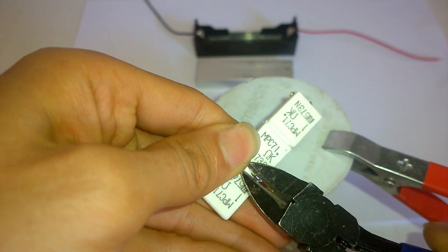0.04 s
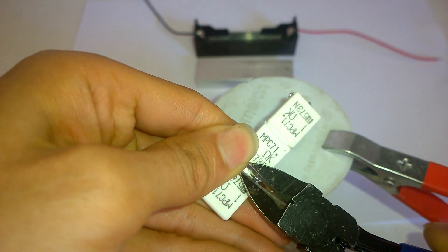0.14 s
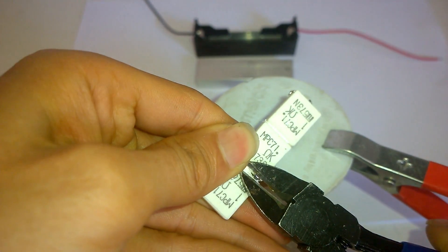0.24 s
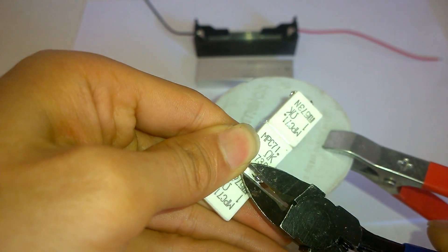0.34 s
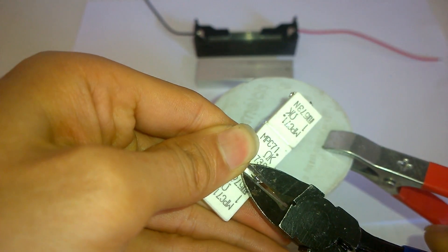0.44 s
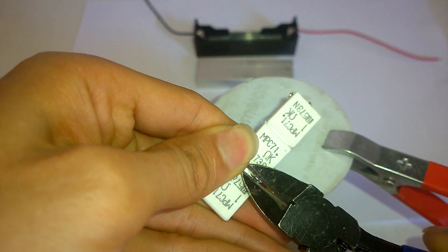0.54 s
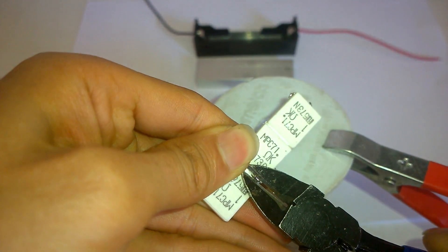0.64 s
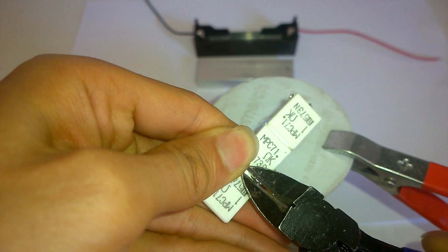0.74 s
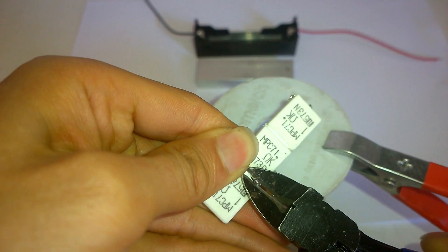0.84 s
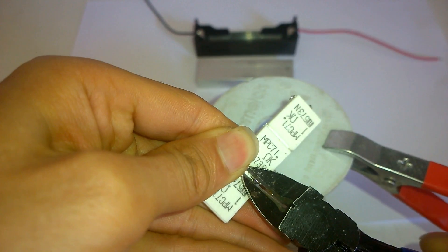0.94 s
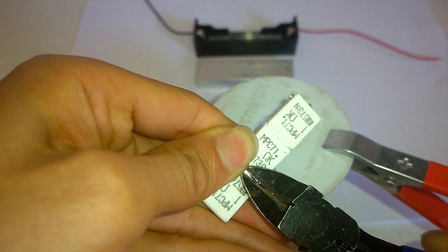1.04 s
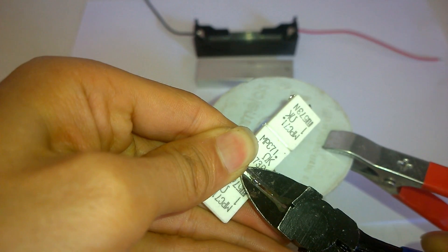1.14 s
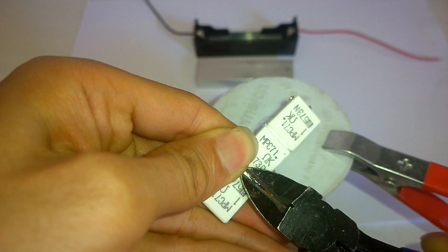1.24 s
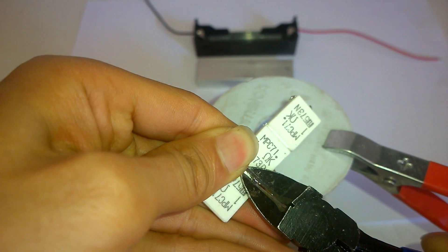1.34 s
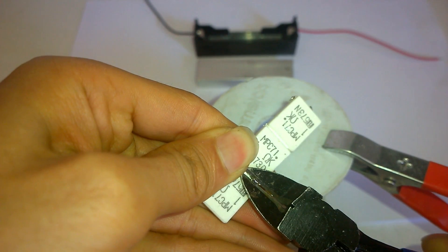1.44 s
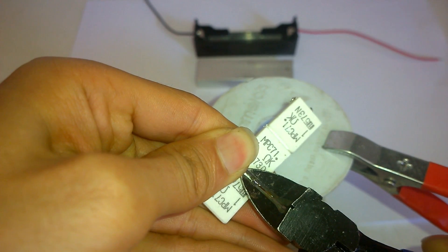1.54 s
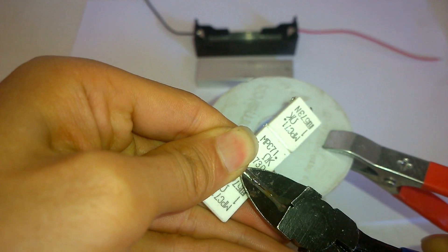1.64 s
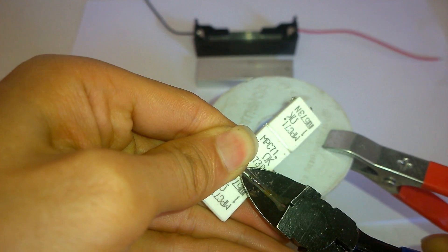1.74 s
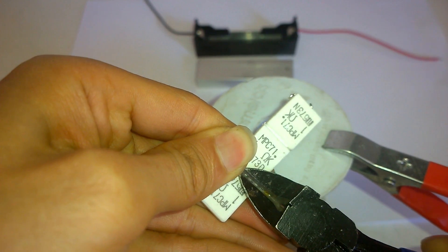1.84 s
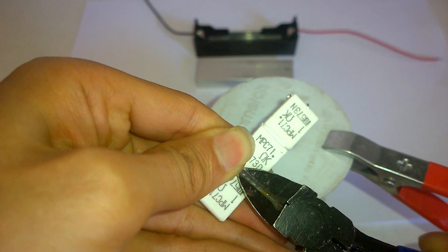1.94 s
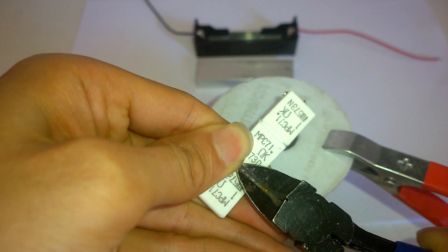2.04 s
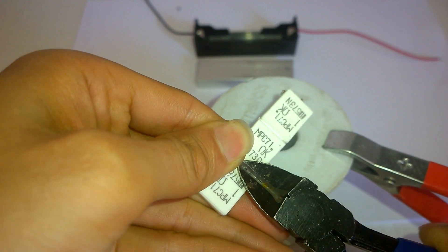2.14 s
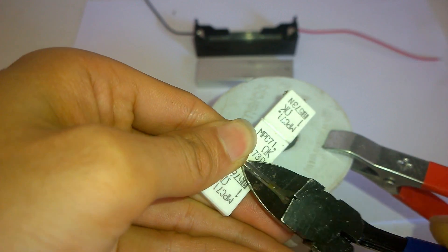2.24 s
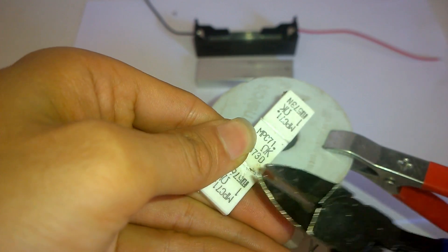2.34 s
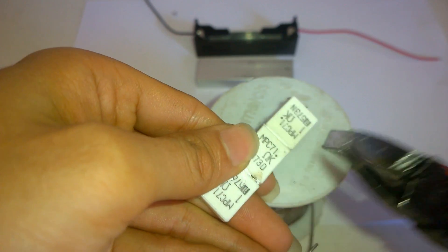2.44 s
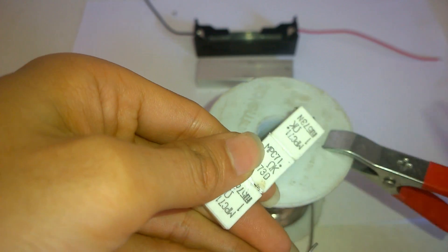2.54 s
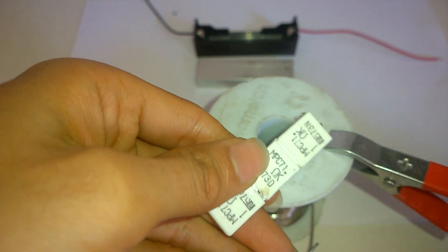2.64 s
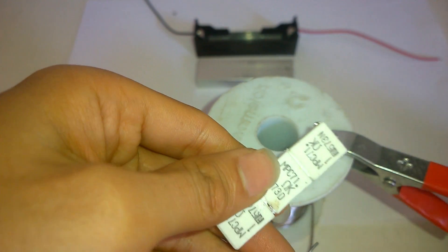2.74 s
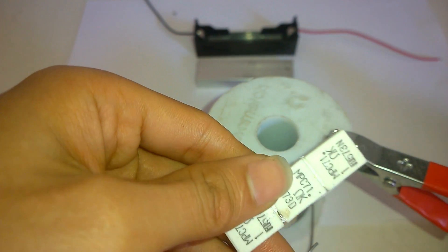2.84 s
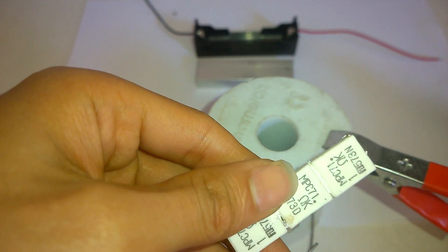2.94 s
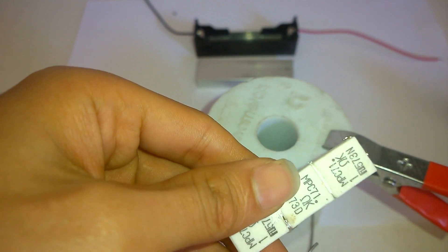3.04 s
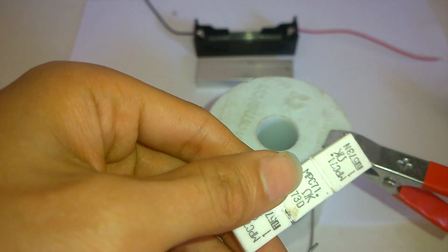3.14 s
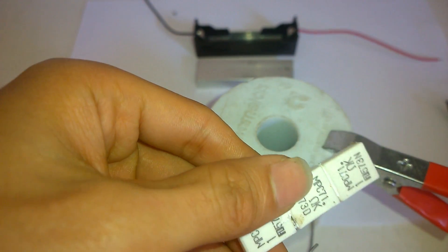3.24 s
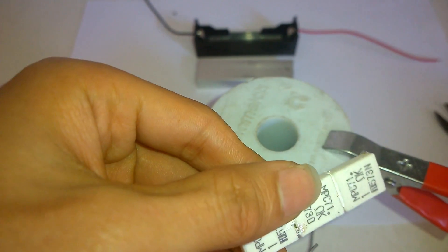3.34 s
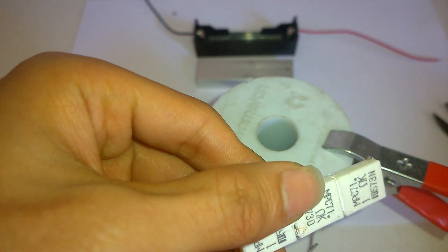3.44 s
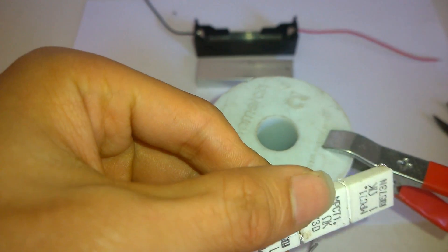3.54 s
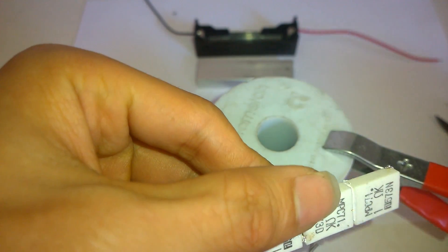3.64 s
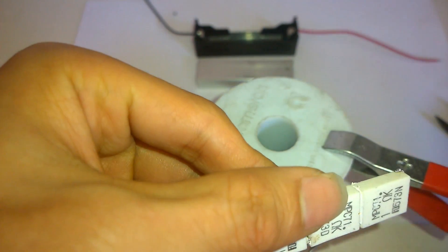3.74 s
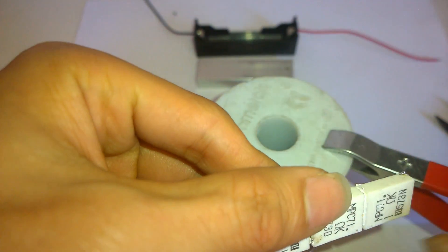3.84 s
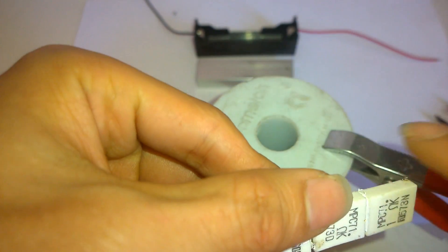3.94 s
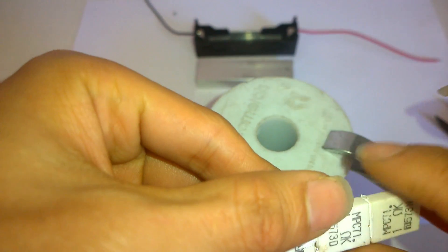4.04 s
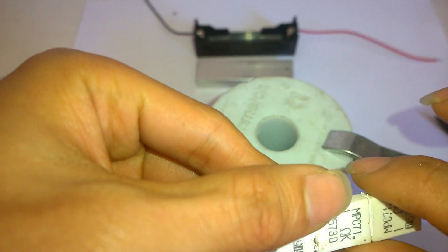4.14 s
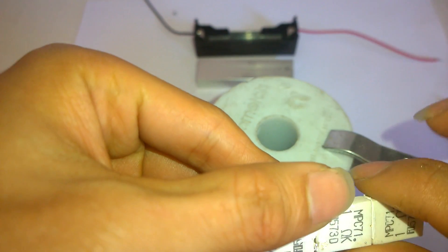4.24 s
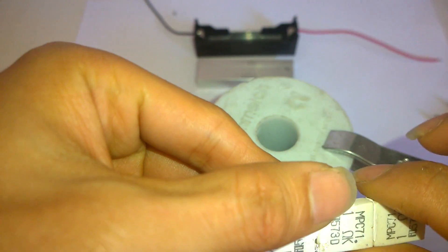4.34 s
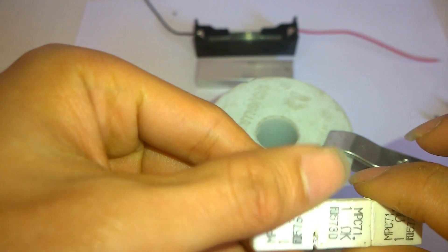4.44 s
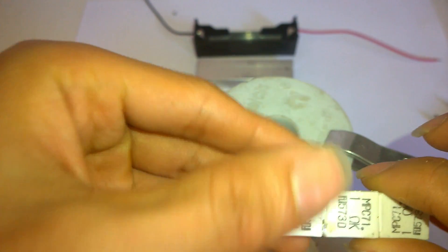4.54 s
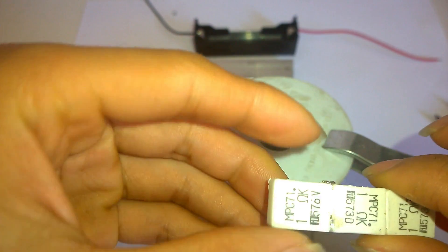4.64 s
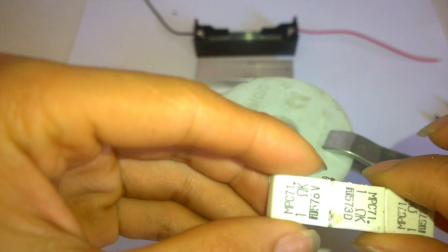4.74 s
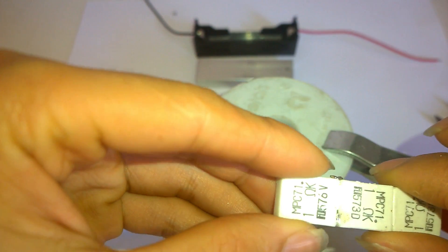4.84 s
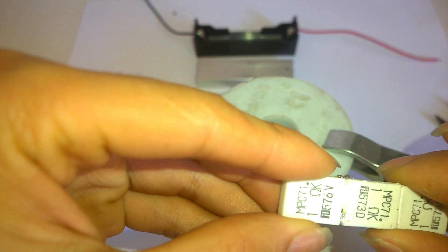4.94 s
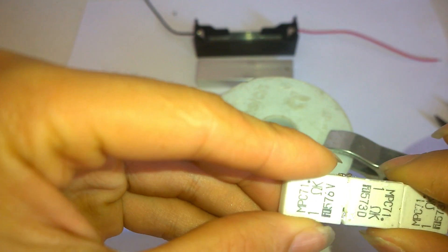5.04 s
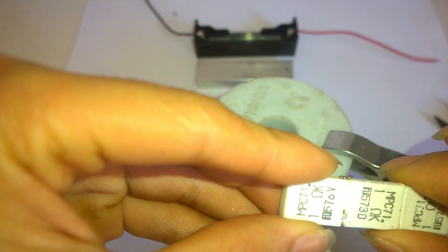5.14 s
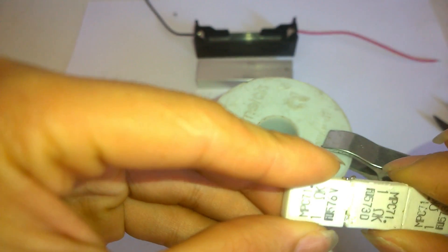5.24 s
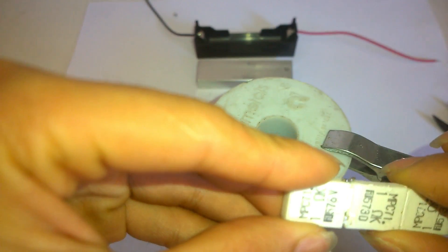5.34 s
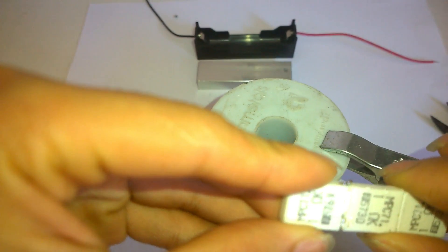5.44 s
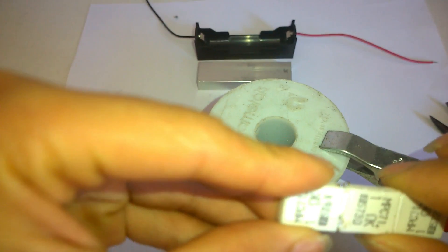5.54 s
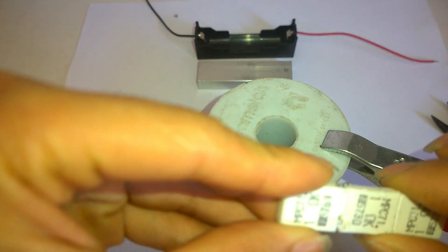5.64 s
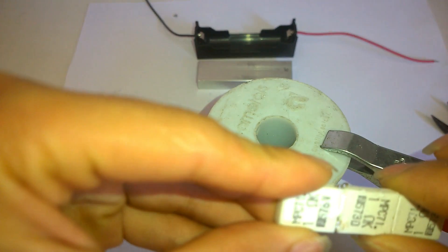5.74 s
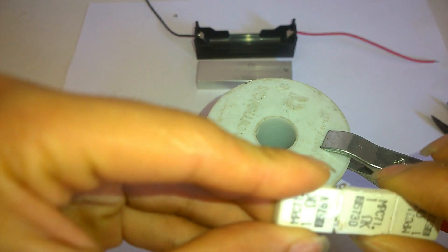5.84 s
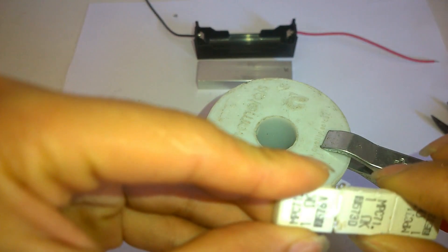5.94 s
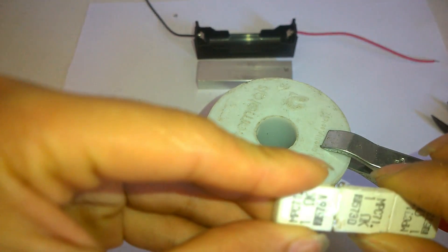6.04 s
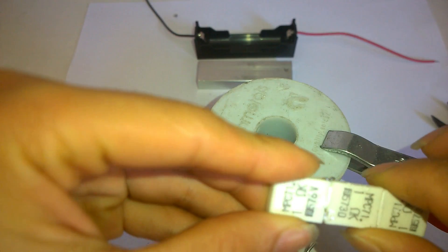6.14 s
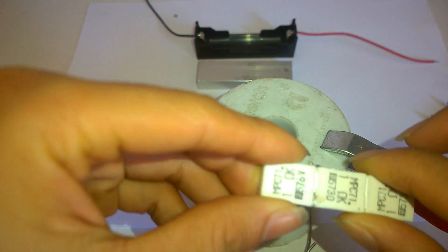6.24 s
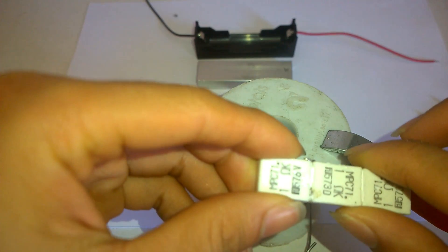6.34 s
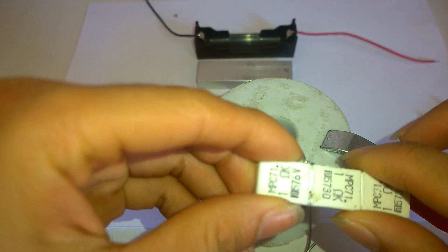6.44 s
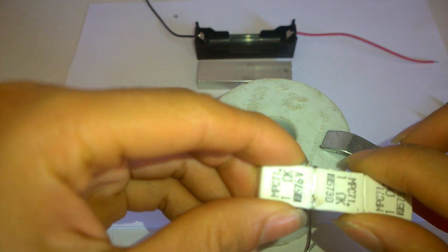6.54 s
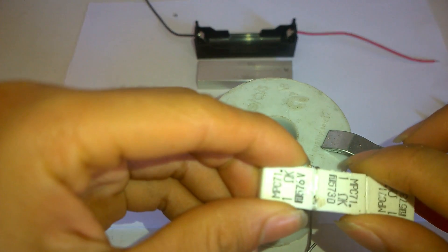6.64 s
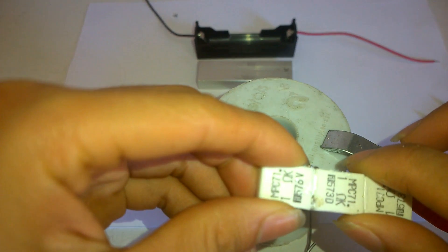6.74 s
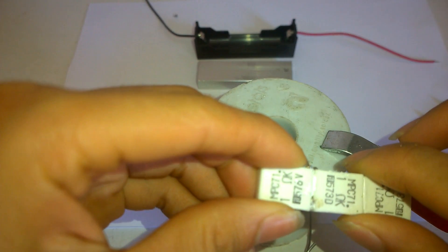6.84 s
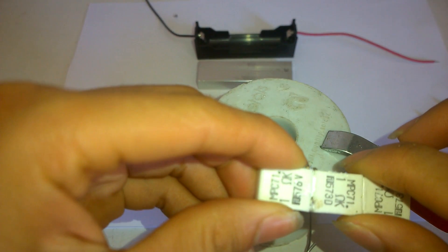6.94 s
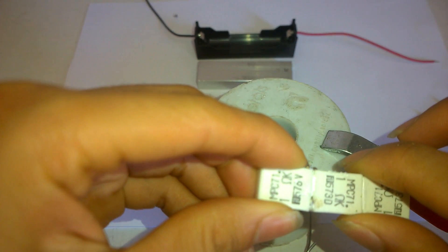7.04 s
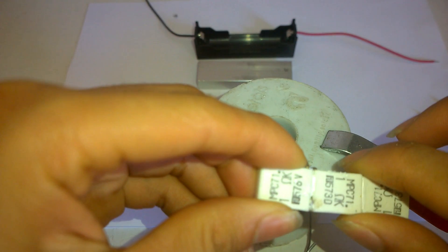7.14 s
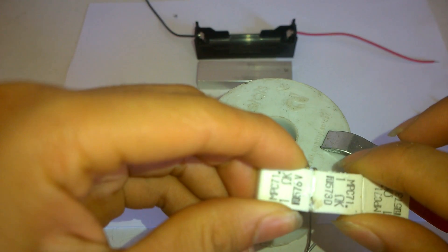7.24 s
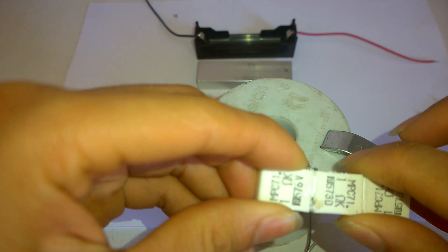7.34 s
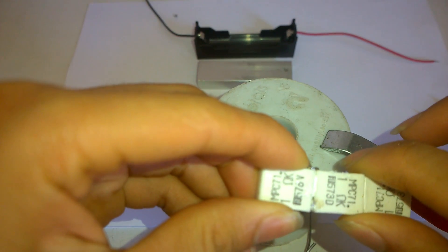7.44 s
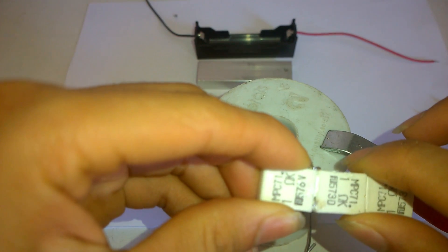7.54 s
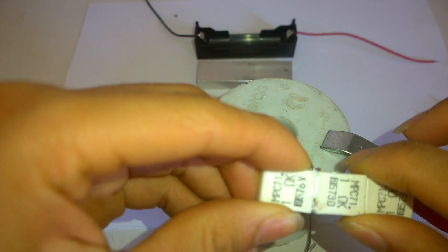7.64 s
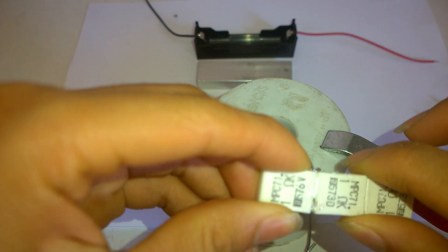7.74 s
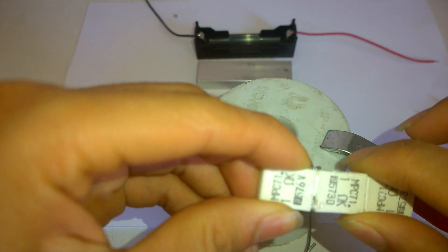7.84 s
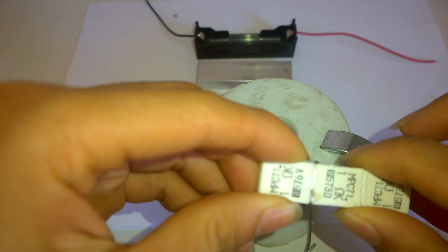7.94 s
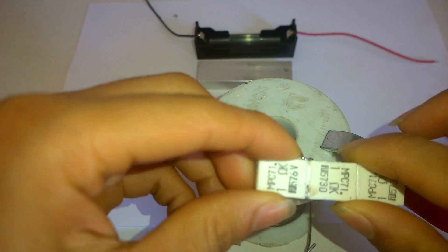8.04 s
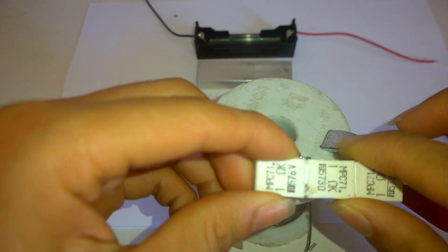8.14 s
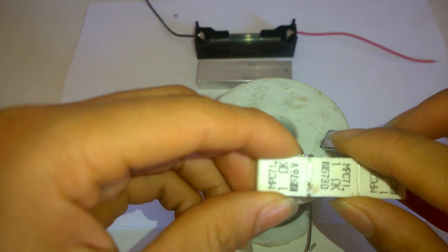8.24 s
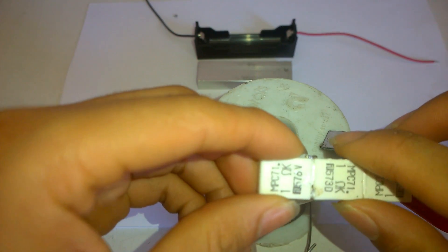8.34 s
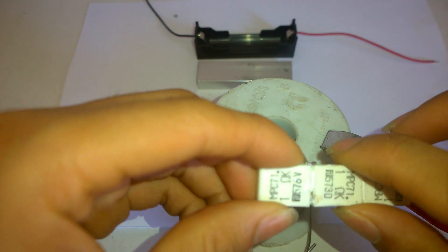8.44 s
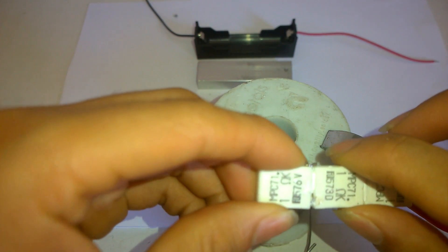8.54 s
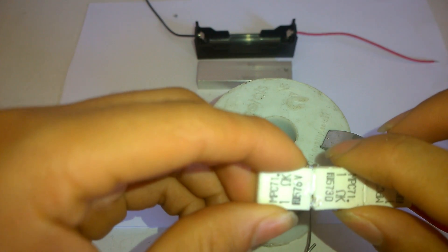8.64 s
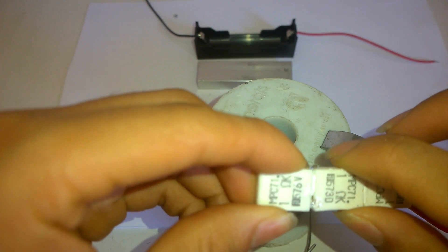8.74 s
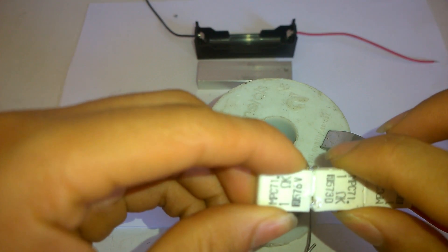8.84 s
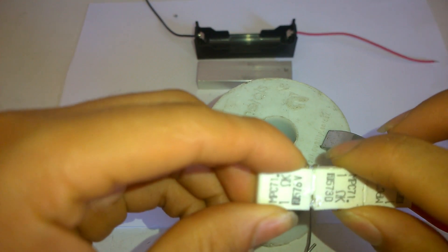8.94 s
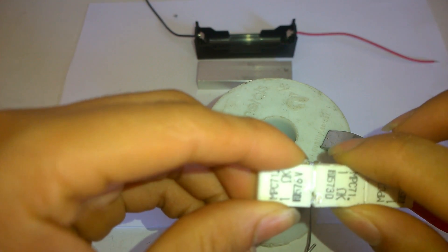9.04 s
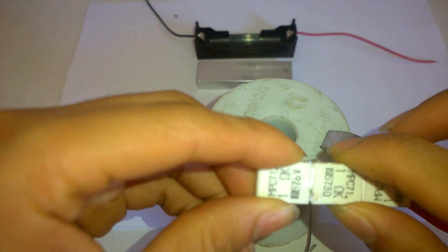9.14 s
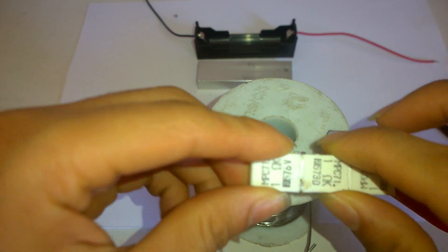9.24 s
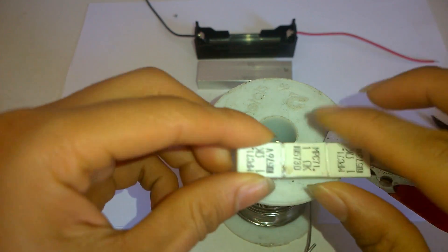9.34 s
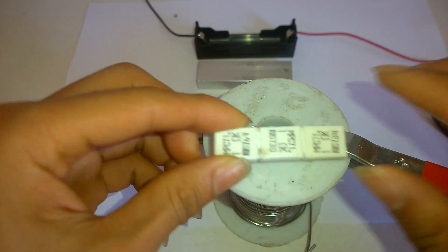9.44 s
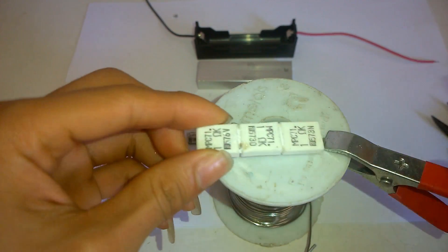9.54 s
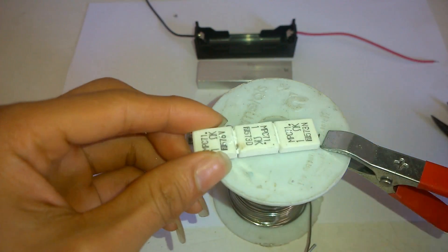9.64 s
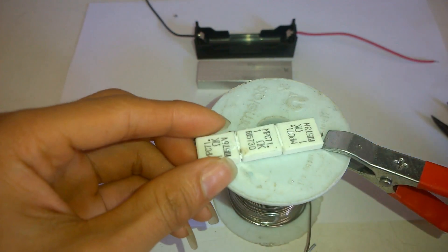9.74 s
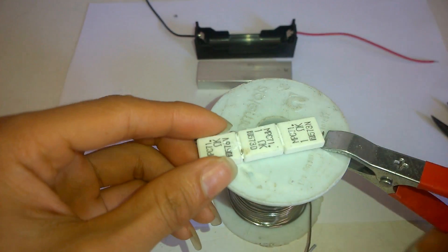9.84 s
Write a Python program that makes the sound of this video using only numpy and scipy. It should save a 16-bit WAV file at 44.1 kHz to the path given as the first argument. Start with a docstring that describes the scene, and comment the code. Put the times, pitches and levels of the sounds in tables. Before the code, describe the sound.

In a small room beside a street, an engine idles low under faint fan air. Soft handling strokes, then cutters snap a wire very loudly and the offcut instantly smacks the microphone. Jaws click open, the tool knocks twice on the bench. Deep throbbing exhausts and a passing vehicle swell outside, then a thin wire ticks and scrapes near the end.

```python
"""In a small room beside a street, diagonal cutters snip a wire lead off a ceramic resistor.
The offcut strikes the microphone, the jaws click open and the cutters knock down on the bench: decaying modes
and noise bursts. Soft strokes, brief rushing swells and a scraping lead come from random clicks; wire ends
tick as damped modes. A fan gives wavering tones over air noise; outside, an engine idles in firing orders,
exhausts boom with beats, traffic passes as coloured noise ruled by distance, and a distant wheel whines."""
import sys
import numpy as np
from scipy import signal
from scipy.fft import rfft, irfft, next_fast_len
from scipy.io import wavfile
from scipy.ndimage import uniform_filter1d, map_coordinates

SR = 44100
rng = np.random.default_rng(int(sys.argv[2]) if len(sys.argv) > 2 else 0)


def pcm_store(signal):
    """Save signal as 16-bit PCM."""
    levels = np.round(np.clip(np.atleast_2d(signal), -1, 1) * 32767)
    wavfile.write(sys.argv[1], SR, levels.astype(np.int16).T)


N = 436590
TIME = np.arange(N) / SR
HALF_SECOND = SR // 2  # samples

# Noise spectra: (frequency [Hz], density [dB per Hz])
RUSH_COLOUR = [(200, 9), (500, 11.5), (1500, 2.5), (3000, 0.5), (6500, -3.5), (9000, -6.5), (15000, -8)]
RUMBLE_COLOUR = [(24, -18), (33, -4), (43, 3.5), (54, 0), (66, -8.5), (80, -6), (130, -12.5), (165, -13.5),
                 (210, -28), (500, -56.5), (3000, -95)]
TYRE_COLOUR = [(70, 7.5), (240, 1.5), (500, 0), (660, 0.5), (860, 2), (1300, -7), (1700, -16),
               (2400, -22.5), (3000, -27.5), (5000, -34.5), (8000, -53), (15000, -57.5)]
DRONE_COLOUR = [(52, -1.5), (60, 11.5), (71, 19.5), (92, 10.5), (200, -0.5), (330, 0), (490, 8),
                (600, -9.5), (830, -1.5), (1500, -10.5), (2550, -12.5), (2900, -20.5), (5000, -25),
                (15000, -49)]
HISS_COLOUR = [(700, -12.5), (1300, 3.5), (2000, -3), (2700, -14.5), (3300, -20.5), (5000, -31),
               (8000, -48.5)]
AIR_COLOUR = [(100, -0.5), (200, -3), (300, -4.5), (510, 6), (600, -4), (850, 1), (1100, -3), (1530, -17.5),
              (2050, -6), (2800, -23.5), (5000, -23.5), (8000, -34), (15500, -38)]
STEEL_COLOUR = [(2500, -20.5), (4900, -2), (6500, -7), (8000, 0.5), (9100, 3.5), (10500, -2), (13000, -7.5),
                (15500, -7.5)]
GRIND_COLOUR = [(300, -6), (2800, -17), (4900, -0.5), (6400, -8), (7700, -1.5), (9200, 2), (11000, -6),
                (15500, -10.5)]
KNOCK_COLOUR = [(70, -25), (140, -11), (230, -14), (380, -1.5), (540, -0.5), (850, -2.5), (1250, -3.5),
                (1600, -13), (2100, -13), (2600, -14), (3200, -19), (4200, -18), (6500, -26), (9000, -42),
                (15000, -50)]
WASH_COLOUR = [(60, -4.0), (100, -7.5), (140, 6.0), (165, -4), (200, -15.5), (480, -14.5),
               (700, -19.5), (1500, -34.5), (5000, -42.5), (12000, -65.5)]
HOWL_COLOUR = [(600, -25.5), (800, 0.0), (930, -1.5), (1100, -11.0), (1600, -35.5), (6000, -70)]

# Modes of struck bodies: (frequency [Hz], level [dB], T60 [s])
LEAD_BREAK_MODES = [(923, -22.5, 0.014), (1990, -18.5, 0.03), (4970, -2, 0.0064), (5650, -2.5, .011),
                    (6800, -10.5, 0.0053), (9260, -7.5, 0.0051), (10300, -11.5, 0.012),
                    (11910, -14.5, .012), (14000, -13.5, 0.0083)]
HOUSING_MODES = [(495, -15, 0.016), (920, -4, 0.006), (1280, -11, .0055), (2050, -21, .01),
                 (2750, 0.5, 0.0036), (4100, -10, .0035), (5900, -7.5, .002), (9940, -9, .002),
                 (13500, -13, .002)]
JAW_MODES = [(517, -9.5, .02), (1130, -10, .016), (2030, -11, .022), (2940, -14, .015), (3700, -6, 0.015),
             (4500, -9, .014), (5330, -2, 0.02), (5850, -5, 0.02), (6309, -2.5, 0.028), (10000, -15, .012)]
LEAD_MODES = [(3300, -3, 0.016), (4560, 1.5, 0.035), (5300, -7, .016), (5600, -3, .012), (6500, -3, 0.019),
              (7360, -6, 0.018), (9500, -13, 0.028), (10900, -12, 0.032), (13700, -20, .06)]
WIRE_END_MODES = [(4440, 1, 0.035), (6260, 0, 0.014), (7160, -6, 0.013), (9340, -8, .04),
                  (9590, -10, 0.056), (10240, -6, 0.075), (10360, -10, 0.082), (10400, -14, .05),
                  (11480, -13, .035), (14030, -22, .11)]
BENCH_MODES = [(110.6, -17, 0.26), (140.4, -8.5, 0.24), (191, -16, 0.23), (319, -8.5, 0.17),
               (370, -10.5, 0.063), (505, -3, 0.064), (534, 0.5, .05), (635, -4, 0.022), (840, -14, 0.072),
               (877, -12.5, 0.055), (1020, -14, 0.06), (1280, -11, 0.035), (1950, -27, .05),
               (2560, -30, 0.041)]
BLOW_MODES = [(530, 6, 0.013), (1240, -3.5, 0.0081)]
SCRAPED_WIRE_MODES = [(4690, 1.5, 0.0096), (4944, 2, 0.005), (5600, -4, 0.0066), (7350, -6, .006),
                      (9000, -17, .004), (12400, -12, .004)]

# Firing orders of the idling engine: (multiple of firing rate, level [dB], change under load [dB])
IDLE_ORDERS = [(1, -8.5, -4), (2, -9.5, -4.5), (3, -3, 6), (3.5, -9.5, 0), (4, -1.5, -4.5)]
# Exhaust partials: (multiple of the note, level [dB])
EXHAUST_ORDERS = [(1, -2), (1.6, -12), (3, -15.5)]
# Fan blade and motor tones: (frequency [Hz], level [dB])
FAN_TONES = [(275, -64.5), (354, -62), (529, -56), (884, -68), (1987, -75.5), (2025, -78.5), (2074, -78.5)]

# Soft strokes and brief swells of rushing noise:
# (middle [s], half length [s], level [dB], treble edge [Hz])
STROKES_AND_SWELLS = [(0, 0.076, -54, 13000), (0.252, 0.065, -52.5, 5500), (0.443, 0.08, -58.5, 13500),
                      (0.702, 0.05, -57.5, 13000), (0.79, .05, -57.5, 5500), (1.02, 0.098, -49, 5900),
                      (2.275, 0.067, -56.5, 6500), (3.54, 0.029, -52.5, 6990), (6.289, 0.037, -36, 1100),
                      (6.79, .04, -37.5, 1000), (8.72, 0.18, -61, 4000), (9.04, 0.2, -55, 4500),
                      (9.8, 0.25, -48, 8600)]
# Exhaust booms: (start [s], end [s], attack [s], level [dB], note [Hz], beat [Hz])
EXHAUSTS = [(-0.2, 1.5, 0.26, -38, 40.2, 6.5), (4.49, 5.34, .05, -40.5, 45.9, 6.6),
            (5.41, 6.38, 0.068, -34, 43.96, 5.6), (6.38, 7.1, 0.058, -38, 42.98, 5.8),
            (6.8, 7.67, 0.27, -31, 42.55, 4.03), (8.42, 10, 0.11, -40.5, 45.97, 6.3)]
# Passing vehicles: (nearest [s], time to cover their distance from the house [s], tyres [dB], drone [dB])
PASSES = [(6.8, 1.08, -37, -63), (9.6, 0.74, -50.5, -39), (9.4, .27, -47, -42.5)]
# Lead ticks: (time [s], level [dB], pitch ratio, ring length ratio)
TICKS = [(1.1002, -48, 1.2, 0.22), (1.218, -38.5, 0.96, 0.91), (1.234, -46, 1.02, 0.37),
         (3.217, -50.5, 0.77, 0.47), (9.381, -28.5, 1.04, 0.39), (9.391, -46, 1.2, 0.3),
         (9.4467, -41, 1.1, .6), (9.5725, -39.5, 0.98, 0.33), (9.7355, -40.5, 1.1, 0.4),
         (9.752, -47, 1.08, .3)]
# Bounces of a loose wire end: (time [s], level [dB], tilt [dB per octave])
BOUNCES = [(2.862, -43.5, -1), (2.8766, -48, 6.5)]
# The lead snaps: (time [s], level [dB])
SNIPS = [(1.8237, -4.5)]
# The offcut strikes the microphone housing: (time [s], level [dB])
OFFCUTS = [(1.8502, 1)]
# The jaws spring open: (time [s], level [dB])
RELEASES = [(2.0951, -29.5), (2.0975, -39.5), (2.0997, -39), (2.107, -51), (2.143, -50), (2.177, -60)]
# The cutters land and rock on the bench: (time [s], level [dB], treble edge [Hz])
KNOCKS = [(3.3779, -12.5, 10960), (3.3916, -26.5, 9000), (3.4153, -32.5, 3000), (3.5501, -18.5, 4050),
          (3.5746, -34, 1500)]

IDLE_HZ = 38.83
LOAD_S, LOAD_HALF_S = 1.87, 0.17  # the engine takes up load
# The engine idles close by, then draws off to a distant murmur.
IDLE_DB, IDLE_LEAVES_S, IDLE_FADE_DB_PER_S, IDLE_FAR_DB = -33.5, 1.63, 4.5, -45
STREET_RUMBLE_DB = -46
EXHAUST_RELEASE_S, THROB_DB, BEAT_DEPTH = 0.18, 1, .75
FALL_DB_PER_DOUBLING = 13  # with distance
HISS_DB, HISS_NEAREST_S, HISS_CROSSING_S, HISS_SURGE_DB = -51.5, 7.07, 1.65, 0.96
AIR_DB = -55
STILLED_S, STILLED_DECAY_S = 2.907, .008  # a finger touches the ringing wire
CASE_BASS_HZ = 600  # the small housing passes little below this
WHINE_HZ, WHINE_SAG_HZ_PER_S, WHINE_DB = 820, 50, -53
WHINE_START_S, WHINE_END_S, WHINE_ATTACK_S, WHINE_RELEASE_S = 3.78, 4.37, 0.3, 0.06
SCRAPE_MIDDLE_S, SCRAPE_SAG_PER_S = 9.47, 0.49  # the ring drops as the wire's free length grows
CHATTER_DB, SCRAPE_EASE_DB_PER_S = 1.3, 35
ROOM_T60_S, ROOM_TREBLE_T60_S = 0.2, .19
TOP_HZ = 15900


def amp(db):
    """Logarithmic level: decibels become amplitude gain."""
    return 10 ** (np.asarray(db) / 20)


def unit(x):
    """Normalisation: scale to unit standard deviation."""
    return x / np.std(x)


def walk(rate):
    """Smoothed random process: held Gaussian steps, averaged twice, with spread near 1."""
    hold = int(SR / rate)
    steps = np.repeat(rng.standard_normal(N // hold + 1), hold)
    smooth = uniform_filter1d(uniform_filter1d(steps, hold), hold)
    return 1.297 * smooth[:N]


def colour(x, points):
    """Spectral shaping: filter by a (frequency, dB) curve and scale to rms 1."""
    hz, db = np.transpose(points)
    size = next_fast_len(len(x))
    f = np.maximum(np.fft.rfftfreq(size, 1 / SR), 1)
    gain = amp(np.interp(np.log(f), np.log(hz), db))
    gain = gain * np.minimum(f / hz[0], 1) ** 2  # roll off below the first point
    return unit(irfft(rfft(x, size) * gain, size)[:len(x)])


def noise(points, flicker_db):
    """Coloured random noise: a shaped spectrum with a flickering level."""
    return colour(rng.standard_normal(N), points) * amp(flicker_db * walk(14))


def soften(x, hz):
    """Low-pass filtering: a second-order Butterworth response."""
    return signal.sosfilt(signal.butter(2, min(hz, .45 * SR), fs=SR, output="sos"), x)


def fade(t60):
    """Exponential damping: half a second of decay that falls 60 dB in t60 seconds."""
    return np.exp(-np.log(1000) * TIME[:HALF_SECOND] / t60)


def ring(modes, pitch=1, length=1, tilt_db=0):
    """Modal superposition: damped sines of alternating sign, tilted per octave by the point of contact."""
    t = TIME[:HALF_SECOND]
    total = 0
    for k, (hz, db, t60) in enumerate(modes):
        octaves = np.log2(hz / modes[0][0])
        gain = (-1) ** k * amp(db + tilt_db * octaves)
        total = total + gain * fade(t60 * length) * np.sin(2 * np.pi * hz * pitch * t)
    return total


def crack(db, t60):
    """Contact noise: a short decaying random burst."""
    return amp(db) * fade(t60) * soften(rng.standard_normal(HALF_SECOND), hz=12056)


def place(sound, s, db):
    """Time shift: set a sound at its moment on an empty track."""
    return amp(db) * np.pad(sound, (int(s * SR), N))[:N]


def slips(start, end, rate, edge):
    """Stick-slip friction: random small clicks between two moments."""
    gate = np.clip(np.minimum(TIME - start, end - TIME) / edge, 0, 1)
    happens = rng.random(N) < rate / SR
    return gate * rng.standard_normal(N) * happens * np.sqrt(SR / rate)


def tone(hz, spread_hz, rate):
    """Frequency modulation: a sine of rms 1 whose pitch wanders."""
    return np.sqrt(2) * np.sin(2 * np.pi * np.cumsum(hz + spread_hz * walk(rate)) / SR)


def swell(start, end, attack, release):
    """Amplitude envelope: gain rises linearly, holds to the end and decays exponentially."""
    return np.clip((TIME - start) / attack, 0, 1) * np.exp(-np.maximum(TIME - end, 0) / release)


def passing(nearest, crossing):
    """Attenuation with distance along a straight road; gain 1 at the nearest point."""
    distance = np.hypot(1, (TIME - nearest) / crossing)
    return amp(-FALL_DB_PER_DOUBLING * np.log2(distance))


def room(x, wet_db):
    """Reverberation: dense reflections from bench and near walls, the treble decaying sooner."""
    scatter = soften(rng.standard_normal(HALF_SECOND), hz=13460)
    low = signal.sosfiltfilt(signal.butter(2, 5000, fs=SR, output="sos"), scatter)
    tail = low * fade(ROOM_T60_S) + (scatter - low) * fade(ROOM_TREBLE_T60_S)
    tail = tail * np.minimum(TIME[:HALF_SECOND] / 0.0033, 1)
    return x + amp(wet_db) * signal.fftconvolve(x, tail / np.linalg.norm(tail))[:N]


def strokes_and_swells():
    """Enveloped granular noise: dense random clicks, heard as soft strokes and brief rushing swells."""
    rush = colour(slips(start=-1, end=11, rate=14000, edge=.01), RUSH_COLOUR) * amp(1.6 * walk(30))
    out = 0
    for s, half, db, hz in STROKES_AND_SWELLS:
        envelope = np.exp(-((TIME - s) / half) ** 2)
        out = out + amp(db) * envelope * soften(rush, hz)
    return out


def engine():
    """Periodic combustion: low firing orders over a dull wash; the third booms as load is taken up."""
    phase = 2 * np.pi * np.cumsum(IDLE_HZ * (1 + .006 * walk(3))) / SR
    load = np.exp(-((TIME - LOAD_S) / LOAD_HALF_S) ** 2)
    tones = 0
    for k, db, load_db in IDLE_ORDERS:
        gain = amp(db + load_db * load + 1.7 * walk(7))
        tones = tones + gain * np.sin(k * phase + 2 * np.pi * rng.random())
    wash = noise(WASH_COLOUR, flicker_db=2.0)
    fallen_db = IDLE_FADE_DB_PER_S * np.maximum(TIME - IDLE_LEAVES_S, 0)
    level_db = np.maximum(IDLE_DB - fallen_db, IDLE_FAR_DB)
    return amp(level_db) * (tones + amp(-7.0) * wash)


def exhausts():
    """Amplitude beating: each boom is a deeply beating low note with rumble, over steady street rumble."""
    out = amp(STREET_RUMBLE_DB) * noise(RUMBLE_COLOUR, flicker_db=1.5)
    for start, end, attack, db, hz, beat_hz in EXHAUSTS:
        note = sum(amp(order_db) * tone(k * hz, spread_hz=1.8, rate=23) for k, order_db in EXHAUST_ORDERS)
        beat = 1 - BEAT_DEPTH * np.cos(2 * np.pi * beat_hz * (TIME - start))
        boom = note * beat + amp(-6.5) * noise(RUMBLE_COLOUR, flicker_db=1.16)
        level = amp(db + THROB_DB * walk(8))
        out = out + swell(start, end, attack, EXHAUST_RELEASE_S) * level * boom
    return out


def traffic():
    """Spreading loss: tyre roar, howl and drone follow each vehicle's distance; hiss comes in surges."""
    howl = noise(HOWL_COLOUR, flicker_db=1.82) * amp(-7.0 + 2.5 * walk(45))
    tyres = noise(TYRE_COLOUR, flicker_db=1.0) * amp(0.7 * walk(60)) + howl
    drone = noise(DRONE_COLOUR, flicker_db=0.0)
    hiss = noise(HISS_COLOUR, flicker_db=1.16) * amp(HISS_DB + HISS_SURGE_DB * walk(6))
    hiss = hiss * passing(HISS_NEAREST_S, HISS_CROSSING_S)
    tyre_power, drone_power = 0, 0  # the vehicles' powers add
    for nearest, crossing, tyre_db, drone_db in PASSES:
        near = passing(nearest, crossing)
        tyre_power = tyre_power + (amp(tyre_db) * near) ** 2
        drone_power = drone_power + (amp(drone_db) * near) ** 2
    return np.sqrt(tyre_power) * tyres + np.sqrt(drone_power) * drone + hiss


def fan():
    """Tonal and broadband flow noise: wavering blade and motor tones over moving air."""
    tones = sum(amp(db + 3.2 * walk(22)) * tone(hz, spread_hz=5, rate=35) for hz, db in FAN_TONES)
    return tones + amp(AIR_DB) * noise(AIR_COLOUR, flicker_db=0.0)


def leads():
    """Free vibration of wire: short ends tick, and one bounces twice before a finger damps it."""
    ticks, tinkle = 0, 0
    for s, db, pitch, length in TICKS:
        tick = ring(LEAD_MODES, pitch, length) + crack(db=-5, t60=0.034)
        ticks = ticks + place(tick, s, db)
    for s, db, tilt in BOUNCES:
        bounce = ring(WIRE_END_MODES, tilt_db=tilt) + crack(db=-5, t60=0.057)
        tinkle = tinkle + place(bounce, s, db)
    stilled = np.exp(-np.maximum(TIME - STILLED_S, 0) / STILLED_DECAY_S)
    return room(ticks, wet_db=-9) + room(tinkle * stilled, wet_db=-16)


def snip():
    """Fracture and friction: the lead snaps, exciting the steel, and the edges grind shut."""
    grip = np.exp(-(TIME[:HALF_SECOND] / .135) ** 6)  # the closed jaws and the hand damp the steel
    steel = colour(rng.standard_normal(HALF_SECOND), STEEL_COLOUR)  # crowded high modes
    steel = steel * fade(t60=0.39) * grip
    snap = 0
    for s, db in SNIPS:
        fracture = ring(LEAD_BREAK_MODES) + crack(db=-6.0, t60=0.016)
        snap = snap + place(fracture + amp(-28.0) * steel, s, db)
    grind = colour(slips(start=1.826, end=1.851, rate=15000, edge=0.0046), GRIND_COLOUR)
    grind = grind * amp(3.2 * walk(250))
    grind = amp(0.5) * grind / np.linalg.norm(grind)
    return room(snap + grind, wet_db=-15.5)


def offcut():
    """Impact at the receiver: the offcut strikes the microphone housing, whose modes start in step."""
    case = sum(ring([mode]) for mode in HOUSING_MODES)
    case = signal.sosfilt(signal.butter(1, CASE_BASS_HZ, "high", fs=SR, output="sos"), case)
    shake = soften(rng.standard_normal(HALF_SECOND), hz=1900) * fade(t60=0.12)  # the whole case shudders
    hits = sum(place(case + crack(db=-8.5, t60=.006) + amp(-21) * shake, s, db) for s, db in OFFCUTS)
    return room(hits, wet_db=-28)


def jaws():
    """Elastic release: the steel jaws spring open and ring with clicks."""
    clicks = sum(place(ring(JAW_MODES) + crack(db=-2.5, t60=0.04), s, db) for s, db in RELEASES)
    return room(soften(clicks, hz=11900), wet_db=-14)


def bench():
    """Plate impact: the bench gives, then booms; the cutters clatter, rock and slide between two knocks."""
    slide = soften(noise(KNOCK_COLOUR, flicker_db=2.0), hz=1100)
    out = amp(-49.5) * swell(start=3.42, end=3.51, attack=.03, release=0.028) * slide
    rattle = amp(2.2 * walk(300)[:HALF_SECOND])
    settling = np.minimum(TIME[:HALF_SECOND] / 0.0034, 1)  # the soft grips land before the steel
    for s, db, hz in KNOCKS:
        clatter = colour(rng.standard_normal(HALF_SECOND), KNOCK_COLOUR)
        clatter = clatter * fade(t60=0.091) * settling * rattle
        boom = soften(ring(BENCH_MODES) - ring(BLOW_MODES), hz=3500)
        out = out + place(boom + amp(-6.5) * soften(clatter, hz), s, db)
    return room(out, wet_db=-12)


def wheel():
    """Tonal whine with random modulation: faint, broken and sinking slightly, far down the street."""
    pitch = WHINE_HZ - WHINE_SAG_HZ_PER_S * (TIME - WHINE_START_S)
    whine = tone(pitch, spread_hz=15.9, rate=130) * amp(3.1 * walk(50))
    return amp(WHINE_DB) * swell(WHINE_START_S, WHINE_END_S, WHINE_ATTACK_S, WHINE_RELEASE_S) * whine


def scrape():
    """Stick-slip excitation: a lead slides on the solder spool, catches, chatters and eases off."""
    slide = amp(-9.0) * slips(start=9.412, end=9.56, rate=6500, edge=0.02)
    catch = slips(start=9.434, end=9.53, rate=8300, edge=0.012)
    since_middle = TIME - SCRAPE_MIDDLE_S
    easing_db = SCRAPE_EASE_DB_PER_S * np.clip(since_middle, -.1, .1)
    drag = (slide + catch) * amp(CHATTER_DB * walk(260) - easing_db)
    wire = ring(SCRAPED_WIRE_MODES)
    rung = signal.fftconvolve(drag, wire / np.linalg.norm(wire))[:N]
    # Reading the sound ever more slowly makes its pitch sink.
    read_s = TIME - SCRAPE_SAG_PER_S * since_middle ** 2 / 2
    rung = map_coordinates(rung, [read_s * SR])
    return room(amp(-47.5) * rung + amp(-48.5) * soften(drag, hz=11000), wet_db=-10)


def scene():
    """Linear superposition: bench work close by, the room and street behind it."""
    background = engine() + exhausts() + traffic() + fan() + wheel()
    handling = strokes_and_swells() + leads() + scrape()
    cutters = snip() + offcut() + jaws() + bench()
    return (background + handling + cutters)[None]


def record(dry):
    """Amplitude and band limiting: the loudest peaks clip and the top is cut."""
    clipped = np.clip(dry, -1, 1)
    return signal.sosfilt(signal.ellip(8, .2, 70, TOP_HZ, fs=SR, output="sos"), clipped)


dry = scene()
out = record(dry)
pcm_store(out)
```